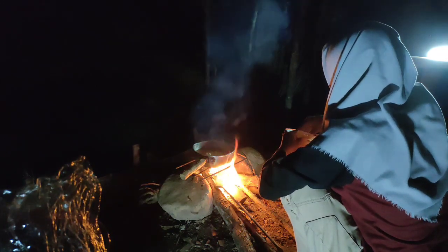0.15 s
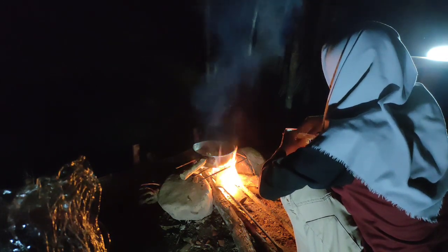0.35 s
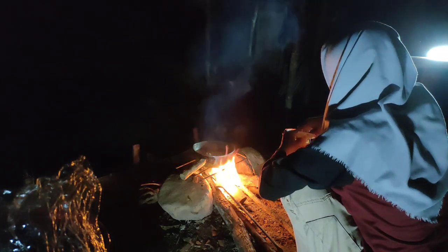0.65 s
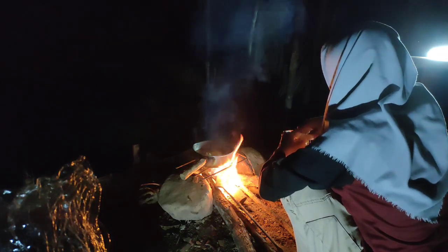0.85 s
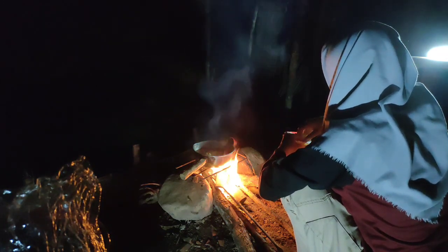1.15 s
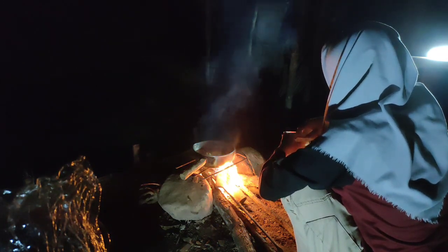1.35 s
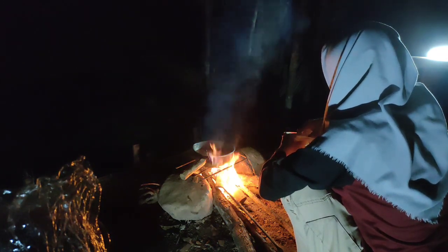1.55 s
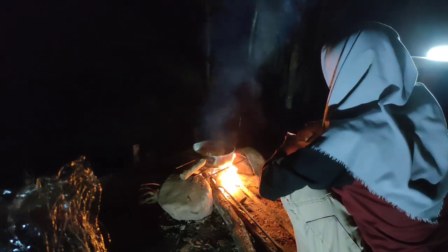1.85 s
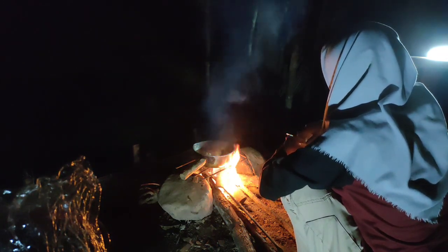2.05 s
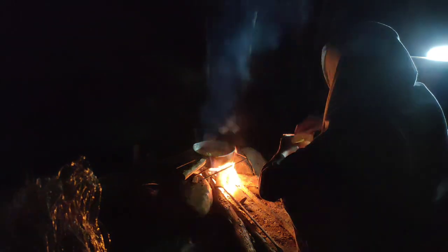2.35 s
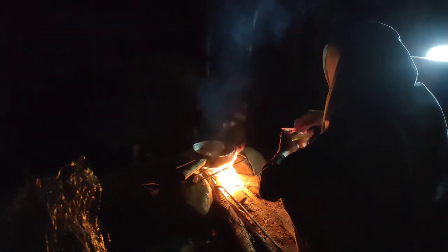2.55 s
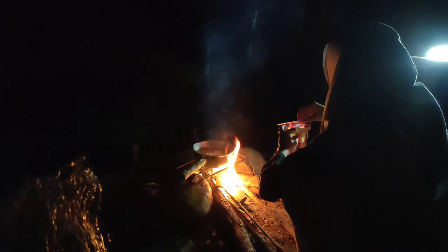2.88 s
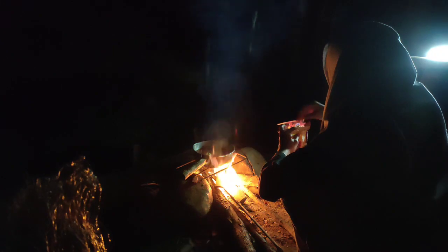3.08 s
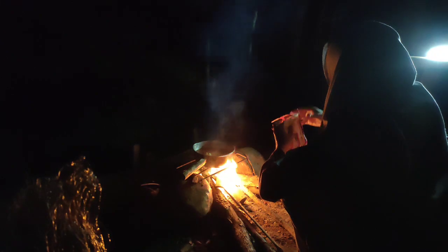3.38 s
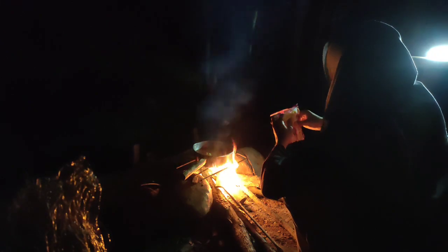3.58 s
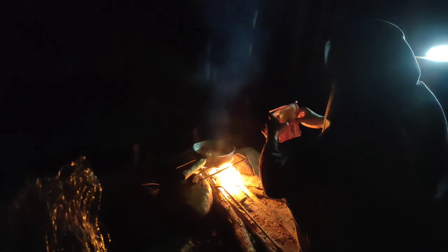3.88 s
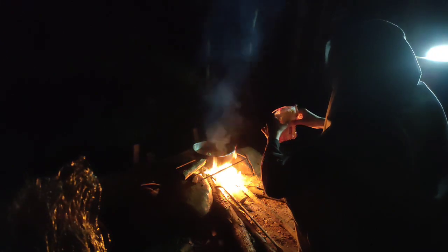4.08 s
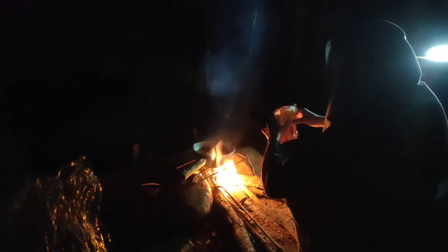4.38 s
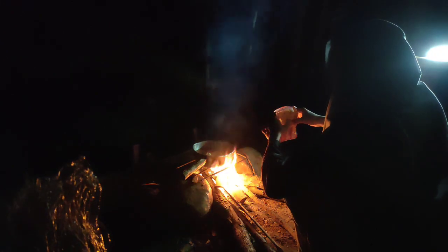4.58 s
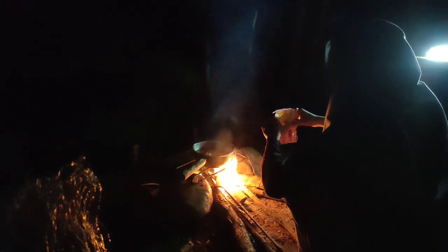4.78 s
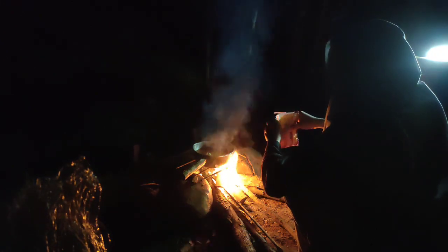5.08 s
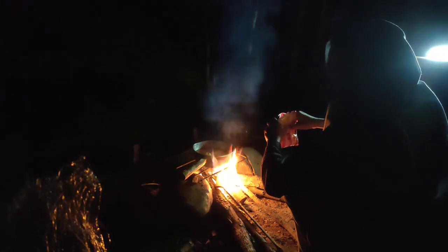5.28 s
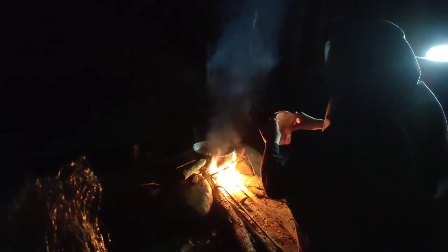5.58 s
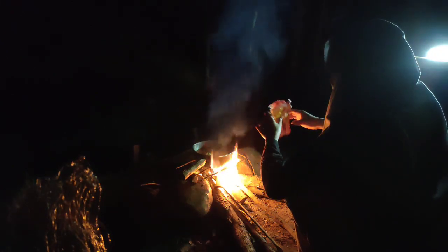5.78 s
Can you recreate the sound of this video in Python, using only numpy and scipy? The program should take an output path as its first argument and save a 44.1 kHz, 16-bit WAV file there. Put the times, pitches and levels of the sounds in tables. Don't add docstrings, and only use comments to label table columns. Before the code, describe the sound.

A steady high-pitched drone of night crickets fills a forest while a small wood fire crackles softly, then gives one sharp crack.

```python
import sys
import numpy as np
from scipy import signal
from scipy.io import wavfile
from scipy.ndimage import uniform_filter1d

SR = 44100
rng = np.random.default_rng(int(sys.argv[2]) if len(sys.argv) > 2 else 0)


def int16_out(signal):
    q = np.round(np.clip(np.atleast_2d(signal).T, -1, 1) * 32767)
    wavfile.write(sys.argv[1], SR, q.astype(np.int16))


def volts_from_db(level):
    exponent = np.asarray(level, float) / 20
    return 10 ** exponent


N = 261513

# frequency in Hz, density in dB per Hz.
AIR_COLOUR = [(15, 0), (25, -14.5), (200, -14.5), (500, -23.5), (750, -25), (1400, -16.5), (3000, -9),
              (3900, -4), (5300, -86), (5500, -24), (6200, -22.5), (6500, -10.5), (9200, -20), (9600, -26),
              (15600, -30)]
# frequency in Hz, likeness from 0 to 1.
AIR_LIKENESS = [(30, 0.37), (250, 0.25), (600, 0), (1500, 0.15), (5000, 0), (12000, 0)]
# frequency in Hz, density in dB per Hz.
CHORUS_COLOUR = [(3500, -37), (3900, -24), (4010, -10.5), (4080, -10), (4300, -5), (4600, -1.5),
                 (5000, -2.5), (5200, -6.5), (5350, -8.5), (5600, -43)]
# time in seconds, level in dB.
CHORUS_SWELL = [(0.0, -37), (0.5, -38.5), (2.18, -38.5), (3.57, -39.5), (4.72, -38.5), (5.93, -39.5)]
# multiples of the wing stroke rate, and the level of each in dB rms.
TRILL_MULTIPLES = [58, 59, 60, 61, 62, 63, 64, 65]
TRILL_LEVELS = [-57, -62, -67, -52, -57, -51, -52, -61]
# start in seconds, length in seconds, level in dB.
CRICKET_SONGS = [
    (-.1, 3.0, -54.5),
    (3.305, 0.02, -61),
    (3.545, 0.07, -63),
    (3.68, 2.4, -54.5),
]
# start in seconds, length in seconds, activity in dB,
# low body relative to it in dB.
FIRE_FLARES = [(-.02, 0.15, -54, -16), (0.424, 0.021, -64, -8), (0.502, 0.22, -57.5, -29),
               (0.878, 0.094, -51, -14), (1.062, 0.092, -49, -8), (1.196, 0.04, -55, -5.5),
               (1.374, 0.048, -56.5, -18), (1.517, 0.021, -54, -17), (1.655, 0.18, -53, -13.5),
               (1.988, 0.043, -58, -21), (2.197, 0.017, -48, -13), (2.337, 0.13, -50, -10.5),
               (2.444, 0.056, -46.5, -4.5), (2.561, 0.026, -50.5, -30), (2.84, 0.095, -62.5, -32),
               (3.578, 0.18, -49, -8.5), (3.96, 0.1, -55, -8.5), (4.029, .12, -45, -11.5),
               (4.287, 0.063, -52.5, -17), (4.531, 0.1, -48.5, -14), (4.657, 0.088, -49, -31),
               (4.768, 0.055, -46.5, -11), (4.872, 0.054, -46.5, -12.5), (4.968, 0.18, -45, -10.5),
               (5.212, 0.08, -38.5, -13), (5.282, 0.063, -44.5, -18), (5.404, 0.063, -45, -9.5),
               (5.499, 0.3, -48, -7)]
# frequency in Hz, density in dB per Hz.
EMBER_COLOUR = [(590, -54), (1000, -18), (2210, -7.5), (2980, -9), (4450, 0), (5350, -13), (5800, -15),
                (6150, -20), (9500, -19), (12500, -17), (15600, -29.5)]
# time in seconds, peak in dB, left-right difference in dB.
SAP_SPITS = [(0.039, -42.5, 12), (0.7123, -41, 1.5), (0.848, -43, 2), (1.1363, -40.5, 4), (1.23, -43.5, 12),
             (1.3136, -48, -11), (2.046, -41, 10), (2.2314, -40, 13), (2.5012, -42, -8), (2.72, -48, 6),
             (3.198, -48, -6), (3.311, -50, -7), (3.7589, -38.5, -2), (4.0243, -50, -2), (4.0547, -49, 15),
             (4.0991, -46, 1.0), (4.284, -36, 7), (4.3034, -27.5, 5), (4.41, -45, 6), (4.599, -40, 10),
             (4.716, -42, -7), (4.9043, -50, 2), (5.008, -37, 11), (5.0449, -39, -2), (1.0, -44, 3),
             (3.6227, -47, 2), (3.66, -41, 3), (4.8025, -44, 2), (5.585, -44, 2), (5.64, -41, 3),
             (5.673, -44, 3)]
# time in seconds, peak in dB, ring in Hz, left-right difference in dB.
BARK_TICKS = [(0.04, -37, 5000, 23), (1.1376, -24.5, 5060, 1), (1.3156, -31, 4450, 9.5),
              (2.204, -60, 4550, -3), (2.231, -38.5, 6000, -5), (3.759, -34, 5000, 0),
              (4.3045, -32, 5500, 1), (4.41, -38, 6500, -3), (4.6, -24, 5000, 0), (4.7145, -21, 4600, 0),
              (4.7215, -26, 4800, 1), (4.727, -45, 6100, -7), (4.8, -30, 6000, -2), (4.904, -28, 4500, 1),
              (4.9146, -31.5, 7040, 0), (5.015, -24.5, 5400, 0)]
# start in seconds, level in dB.
KATYDID_BUZZES = [
    (.16, -66),
    (.88, -63.5),
    (1.52, -66),
    (2.2, -64.5),
    (2.8, -67),
    (3.75, -68),
    (4.45, -65.5),
    (5.05, -60),
    (5.55, -68),
]
# time in seconds, peak in dB, ring in Hz, brightness in dB.
LEFT_LOG_POPS = [(0.129, -42, 1280, -33), (0.437, -49, 2340, -26), (0.511, -40, 1940, -34),
                 (0.561, -39, 1940, -23), (0.968, -37, 1760, -20), (1.313, -35, 2730, -12),
                 (2.199, -32, 3730, -21), (2.379, -35, 1870, -15), (2.452, -54, 2780, -23),
                 (2.532, -40.5, 2180, -31), (3.411, -39, 2540, -32), (4.556, -45, 2750, -9),
                 (4.714, -42, 2360, -40)]
# time in seconds, peak in dB, ring in Hz, brightness in dB.
HEART_POPS = [(0.456, -37, 2000, -42), (1.089, -35, 2700, -23), (1.136, -49, 3500, -12),
              (2.018, -39.5, 2420, -16), (0.820, -45, 2050, -30), (0.846, -40, 2020, -30),
              (0.9133, -44, 2380, -34), (0.947, -52, 2060, -35), (0.979, -38, 1640, -28),
              (1.104, -57, 2200, -28), (1.155, -38, 2090, -32), (1.218, -43, 1920, -34),
              (2.758, -42, 2700, -25), (2.833, -45, 2600, -24), (2.865, -45, 2380, -28),
              (2.9472, -39, 2220, -28), (2.99, -40, 2180, -26), (3.032, -48, 2620, -21),
              (3.072, -42, 2260, -20), (3.5688, -56, 3400, -36), (3.6227, -37, 3400, -24),
              (3.711, -47, 2490, -24), (4.068, -35, 3020, -13), (5.2844, -19, 2220, -28),
              (5.2955, -26, 2300, -30), (2.481, -54, 2800, -22), (3.528, -44, 3520, -27),
              (3.758, -36.5, 1860, -19), (3.969, -35, 2760, -15), (4.032, -38.5, 2330, -41),
              (4.054, -36.5, 1900, -9.5), (4.102, -36.5, 1800, -9), (4.327, -35, 2340, -34.5),
              (4.504, -39, 2580, -19), (5.014, -31, 2300, -28), (5.194, -40, 2240, -18),
              (5.346, -32, 2210, -20), (5.391, -34.5, 2050, -26), (5.428, -25, 3370, -43),
              (5.466, -33.5, 1530, -33), (5.548, -36, 2170, -33), (5.585, -34, 3670, -12),
              (5.673, -42, 1600, -12), (5.703, -50, 2150, -17), (5.724, -28, 2780, -33),
              (5.775, -32, 2040, -24), (5.83, -41, 2780, -20)]
# time in seconds, peak in dB, ring in Hz, brightness in dB.
RIGHT_LOG_POPS = [
    (3.686, -37, 2130, -19),
    (4.303, -32, 3080, -17),
    (4.599, -25, 3380, -13),
    (4.673, -35, 3240, -18),
    (4.754, -31, 3290, -18),
    (4.802, -28, 2970, -18),
    (4.88, -55, 2310, -29),
    (4.903, -30, 2950, -27),
    (4.963, -56, 3400, -27),
    (5.762, -49, 2510, -11),
]
# time in seconds, peak in dB, ring in Hz.
LOG_KNOCKS = [(0.587, -54, 370), (0.978, -55, 536), (1.022, -55, 764), (1.089, -48.5, 910),
              (1.154, -45, 1150), (1.374, -58, 842), (1.415, -54.5, 790), (1.524, -54.5, 735),
              (1.758, -51, 1020), (2.461, -52, 719), (2.481, -45, 1000), (2.584, -53.5, 368),
              (2.732, -54.5, 1090), (3.655, -47, 870), (4.674, -49, 710), (4.841, -55, 476),
              (4.975, -45, 1100), (5.043, -49, 720), (5.532, -47, 710), (5.587, -45.5, 750)]
# time in seconds, peak in dB, t60 in seconds.
FIBRE_SNAPS = [(5.2388, -21, .05), (5.242, -25, .03), (5.2445, -17, .02), (5.2465, -13, .012),
               (5.2477, -11, .012), (5.2495, -13, .012), (5.2515, -18, .014), (5.253, -22, .022),
               (5.2565, -22, .03), (5.2615, -25, .06), (5.269, -28, .05), (5.275, -28, .05),
               (5.2835, -30, .026), (5.295, -31, .04)]
# frequency in Hz, density in dB per Hz.
FIBRE_COLOUR = [(180, -40), (330, -12), (520, -11), (680, -2), (1500, -1), (2800, 3), (5600, 1),
                (9400, -17), (13600, -14), (15600, -40)]
# frequency in Hz, level in dB, t60 in seconds.
LOG_MODES = [(715, -4, 0.0083), (1000, 0, 0.038), (1780, 2, 0.086), (2380, 7, 0.021), (2780, -25, 0.038),
             (3400, 8, 0.02), (4170, 18, 0.022)]
# frequency in Hz, share of the time that a line is muted.
HOLE_SHARE = [(300, 0), (2300, .1), (3950, .22), (4050, 0), (5250, 0), (5600, .12), (6500, .2), (9300, .3),
              (9800, .6), (14500, .6), (15000, .85)]
# frequency in Hz, half width in Hz, share of the time.
HOLE_BANDS = [(2430, 80, .62), (3050, 110, .75), (3460, 110, .85), (3880, 110, .8), (5440, 150, .88),
              (6110, 320, .9), (6780, 110, .66), (7150, 80, .5), (7900, 130, .8), (8120, 130, .78),
              (9550, 270, .9)]


def evened(x):
    return x / np.sqrt(np.mean(x ** 2) + 1e-20)


def read(points, hz):
    f, value = np.transpose(points)
    return np.interp(np.log(hz + 1), np.log(f + 1), value)


def colour(x, points):
    db = np.maximum(read(points, abs(np.fft.fftfreq(4096, 1 / SR))), -100)
    spectrum = np.exp(np.conj(signal.hilbert(np.log(volts_from_db(db)))))
    taps = np.fft.ifft(spectrum).real[:2048]
    taps = (taps / np.linalg.norm(taps)).reshape((1,) * (x.ndim - 1) + (-1,))
    return signal.oaconvolve(x, taps, axes=-1)[..., :N]


def resonate(x, hz, width):
    turn = np.exp(2j * np.pi * hz * np.arange(x.shape[-1]) / SR)
    r = np.exp(-np.pi * width / SR)
    return 2 * (turn * signal.lfilter([(1 - r) ** 2], [1, -2 * r, r * r], x / turn + 1e-18)).real


def drift(per_s):
    knots = rng.standard_normal(int(N / SR * per_s) + 2)
    return np.interp(np.arange(N) / SR * per_s, np.arange(len(knots)), knots)


def strokes(per_s, jitter):
    turns = np.cumsum(per_s * (1 + jitter * drift(40))) / SR + rng.random()
    return np.diff(np.floor(turns), prepend=0.)


def bouts(start, length, db, rise, fall):
    t = np.arange(0, N + 64, 32)[:, None] / SR - start
    shape = np.clip(np.minimum(t / rise + .5, 1 + (length - t) / fall), 0, 1) ** 2
    return np.interp(np.arange(N) / 32, np.arange(len(t)), (shape * volts_from_db(db)).max(1))


def placed(x, pan_db, lag=0):
    return np.array([np.roll(x, lag), x]) * volts_from_db(np.array([[.5], [-.5]]) * pan_db)


def trees(x, t60, wet_db):
    t = np.arange(SR // 2) / SR
    hits = rng.random((2, len(t))) < 2000 / SR
    taps = rng.choice([-1., 1.], (2, len(t))) * hits * volts_from_db(-60 * t / t60)
    return x + volts_from_db(wet_db) * signal.fftconvolve(x, taps / np.linalg.norm(taps[0]), axes=1)[:, :N]


def add(mix, s, sound):
    part = mix[:, round(s * SR):][:, :sound.shape[1]]
    part += sound[:, :part.shape[1]]


def burst(t60):
    return rng.standard_normal(2000) * volts_from_db(-60 * np.arange(2000) / SR / t60)


def air():
    frames, hz = N // 256 + 5, np.fft.rfftfreq(1024, 1 / SR)
    a, b, c, d, patches = rng.standard_normal((frames, 513, 5)).T
    patches = uniform_filter1d(patches, size=12, axis=0)
    patches = evened(uniform_filter1d(patches, size=14, axis=1))
    same = np.clip(read(AIR_LIKENESS, hz), -1, 1)[:, None]
    left = a + 1j * b
    right = same * left + np.sqrt(1 - same ** 2) * (c + 1j * d)
    z = np.array([left, right]) * volts_from_db(read(AIR_COLOUR, hz)[:, None] + 1.7 * patches)
    return volts_from_db(-52) * evened(signal.istft(z, nperseg=1024, noverlap=768)[1][:, :N])


def chorus():
    far = rng.standard_normal((2, N))
    near = np.zeros((2, N))
    for hz in np.linspace(3950, 5300, num=16):
        per_s, pan, lag, throb = rng.random(size=4)
        scrapes = strokes(50 + 110 * per_s, .03) * rng.uniform(0.47, 1, N)
        song = evened(resonate(scrapes, hz, 400)) * volts_from_db(5. * drift(4 + 8 * throb))
        near += placed(song, 8 * (pan - .5), int(24 * lag) - 10)
    near = trees(near, 0.14, -0.89)
    both = evened(colour(far, CHORUS_COLOUR)) * 0.78 + evened(colour(near, CHORUS_COLOUR))
    s, db = np.transpose(CHORUS_SWELL)
    return volts_from_db(np.interp(np.arange(N) / SR, s, db) - .2) * evened(both)


def triller():
    strokes_per_s = 70.92
    turns = np.cumsum(strokes_per_s * (1 + 0.00018 * drift(1.995))) / SR
    lines = np.zeros(N)
    for k, db in zip(TRILL_MULTIPLES, TRILL_LEVELS):
        lines += volts_from_db(db + 3 * drift(4)) * np.cos(2 * np.pi * k * turns + .3 * k * k)
    return placed(1.45 * lines, -6.5, 3)


def cricket():
    scrape = signal.oaconvolve(strokes(40.2, .15), signal.windows.hann(900))[:N] + .3
    song = np.zeros((2, N))
    for hz, db in [(5638, 0), (5728, -4), (5775, -8)]:
        mode = resonate(scrape * rng.standard_normal((2, N)), hz, 32)
        song += volts_from_db(db) * mode * volts_from_db(2.5 * drift(9))
    edge_s = .035
    level = bouts(*np.transpose(CRICKET_SONGS), edge_s, edge_s)
    return level * evened(song + .5 * song[::-1])


def rustle():
    snaps_per_s = 420
    size = volts_from_db(3.2 * np.minimum(rng.exponential(1, (3, N)), 4)) * rng.choice([-1., 1.], (3, N))
    snaps = size * (rng.random((3, N)) < snaps_per_s / SR)
    both = snaps[0] + 3.06 * snaps[1:]
    spot = rng.integers(0, 9, N)
    rings = np.zeros((2, N))
    for k, hz in enumerate(np.geomspace(900, 3900, num=9)):
        rings += evened(signal.lfilter(*signal.iirpeak(hz, 4.5, SR), both * (spot == k)))
    fizz = colour(evened(both) + 1.6 * evened(rings), EMBER_COLOUR)
    body = resonate(snaps[0] + 0.51 * snaps[1:], 660, 560)
    start, length, db, body_db = np.transpose(FIRE_FLARES)
    rise_s, fall_s = 0.026, 0.079
    glow_db, glow_body_db = -60.5, -20.5
    bright = volts_from_db(glow_db) + bouts(start, length, db, rise_s, fall_s)
    dull = volts_from_db(glow_db + glow_body_db) + bouts(start, length, db + body_db, rise_s, fall_s)
    return bright * evened(fizz) + volts_from_db(-7.5) * dull * evened(body)


def thinned(x):
    return signal.lfilter(*signal.butter(2, [9000, 15500], "band", fs=SR), x)


def spits():
    out = np.zeros((2, N))
    for s, db, pan_db in SAP_SPITS:
        tick = thinned(burst(0.012))
        add(out, s, volts_from_db(db - 4.0) * placed(tick / abs(tick).max(), pan_db))
    return out


def ticks():
    out = np.zeros((2, N))
    for s, db, hz, pan_db in BARK_TICKS:
        ring = resonate(np.r_[1., .3 * burst(.006)], hz, .45 * hz)
        add(out, s, volts_from_db(db + 1.0) * placed(ring / abs(ring).max(), pan_db, 2))
    return out


def katydid():
    buzz = resonate(strokes(350, 0.0073), 10660, 1900)
    start, db = np.transpose(KATYDID_BUZZES)
    length_s, rise_s, fall_s = 0.19, 0.24, 0.23
    level = bouts(start, length_s, db, rise_s, fall_s)
    return level * evened(trees(placed(buzz, 3., 1), .15, 3.))


def pops():
    out = np.zeros((2, N))
    for rows, pan_db in [(LEFT_LOG_POPS, 5), (HEART_POPS, 2.5), (RIGHT_LOG_POPS, -1)]:
        for s, db, hz, bright_db in rows:
            puff = burst(.013)
            ring = resonate(puff, hz, 0.3 * hz)
            edge = volts_from_db(bright_db + 9.5) * thinned(puff)
            add(out, s, volts_from_db(db - 3.5) * placed(ring / abs(ring).max() + edge, pan_db, 2))
    return out


def knocks():
    out = np.zeros((2, N))
    for s, db, hz in LOG_KNOCKS:
        ring = resonate(burst(0.016), hz, 0.8 * hz)
        add(out, s, volts_from_db(db + 4.5) * placed(ring / abs(ring).max(), 0., 1))
    return out


def crack():
    snaps, t = np.zeros((2, N)), np.arange(4000) / SR
    for s, db, t60 in FIBRE_SNAPS:
        spread = .2 * np.array([burst(t60), burst(t60)])
        add(snaps, s, volts_from_db(db) * (placed(burst(t60), 0.42, 3) + spread))
    log = sum(volts_from_db(db - 60 * t / t60) * np.sin(2 * np.pi * hz * t) for hz, db, t60 in LOG_MODES)
    ring = signal.fftconvolve(snaps, log[None] / np.linalg.norm(log), axes=1)[:, :N]
    ring = signal.lfilter(*signal.butter(3, 560, "high", fs=SR), ring)
    return trees(volts_from_db(-4) * colour(snaps, FIBRE_COLOUR) + volts_from_db(-12) * ring, .08, -13.)


def scene():
    insects = chorus() + triller() + cricket() + katydid()
    snaps = trees(spits() + ticks() + pops() + knocks(), .08, -8.)
    return air() + insects + rustle() + snaps + crack()


def hollowed(x):
    hz, _, z = signal.stft(x, SR, nperseg=2048, noverlap=1536)
    power = uniform_filter1d((abs(z) ** 2).sum(0), size=4, axis=0)
    power = uniform_filter1d(power, size=3, axis=1) + 1e-20
    around = uniform_filter1d(np.log(power), size=48, axis=0)
    follows = .8 * ((hz < 4000) | (hz > 6450))
    stands = np.log(power) - follows[:, None] * around
    shut = [share * np.exp(-((hz - f) / width) ** 4) for f, width, share in HOLE_BANDS]
    muted = np.max([read(HOLE_SHARE, hz), *shut], axis=0)
    rank = (muted * (power.shape[1] - 1)).astype(int)
    limit = np.take_along_axis(np.sort(stands, axis=1), rank[:, None], axis=1)
    return signal.istft(z * (stands >= limit), SR, nperseg=2048, noverlap=1536)[1][:, :N]


def low_pass(x):
    return signal.sosfilt(signal.butter(12, 15740, fs=SR, output="sos"), x)


def record(dry):
    holed = hollowed(dry)
    return low_pass(holed)


dry = scene()
out = record(dry)
int16_out(out)
```